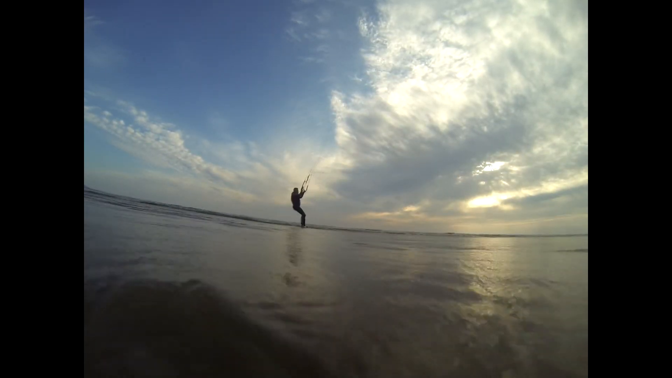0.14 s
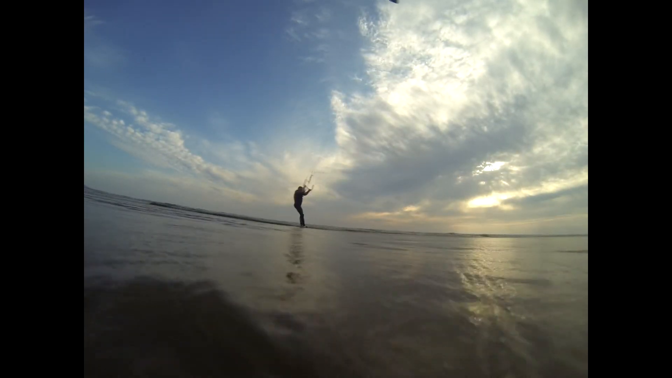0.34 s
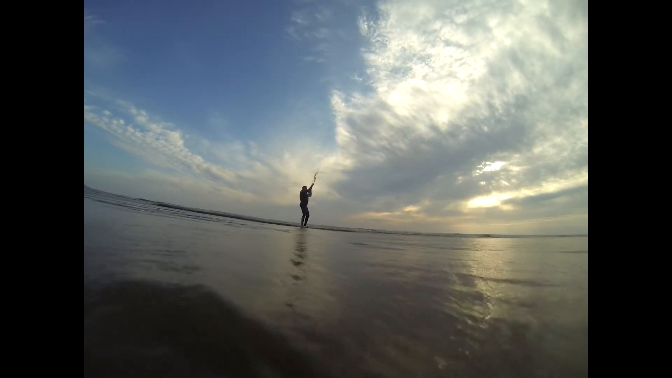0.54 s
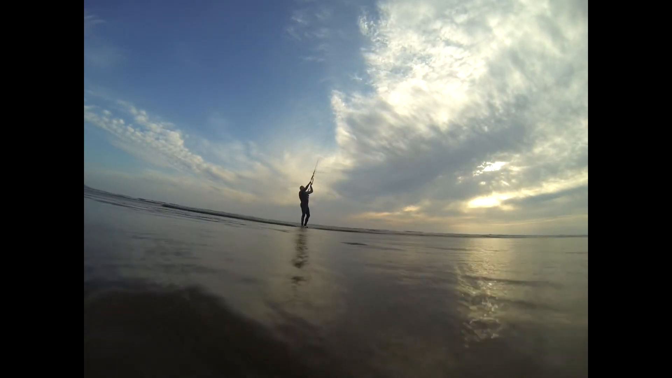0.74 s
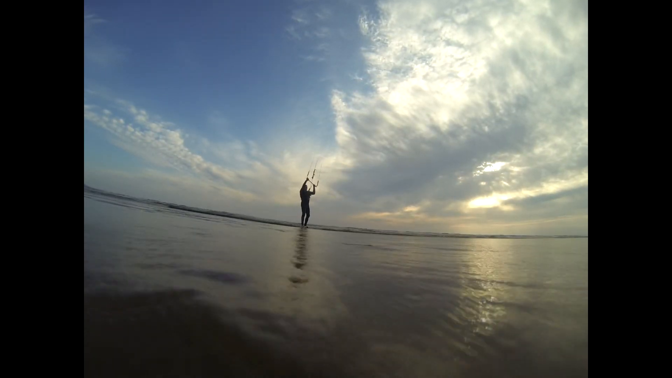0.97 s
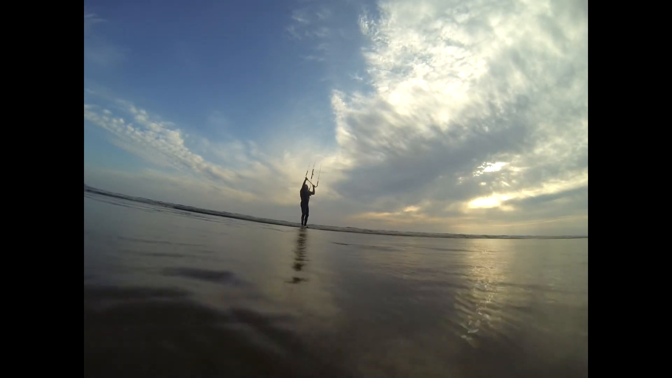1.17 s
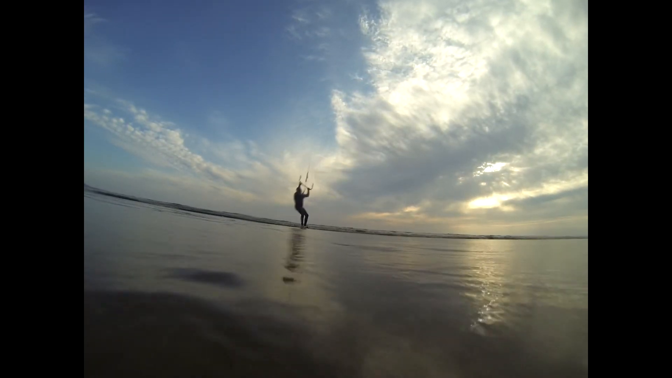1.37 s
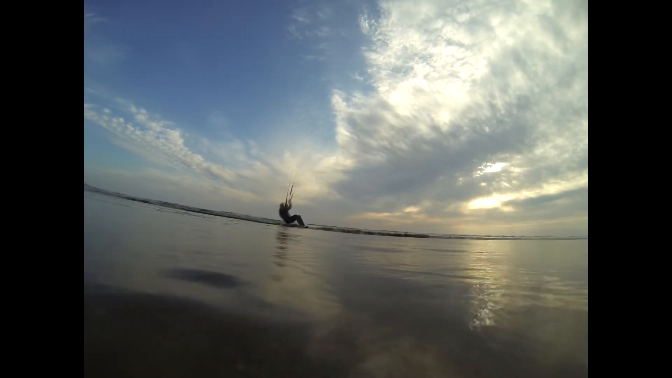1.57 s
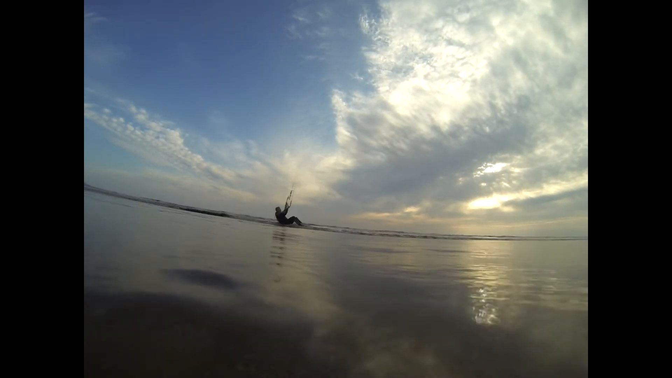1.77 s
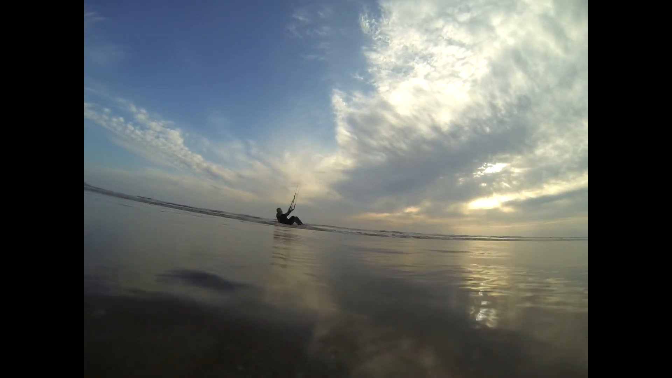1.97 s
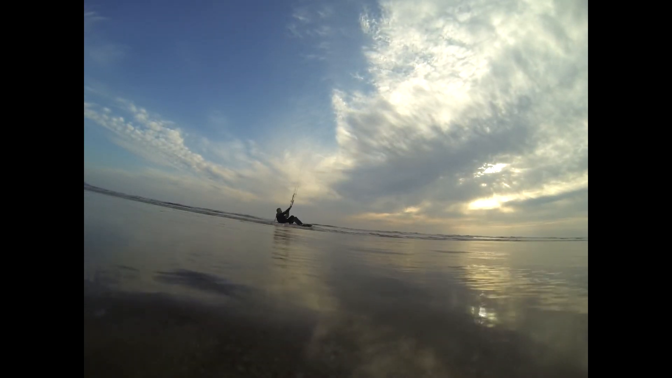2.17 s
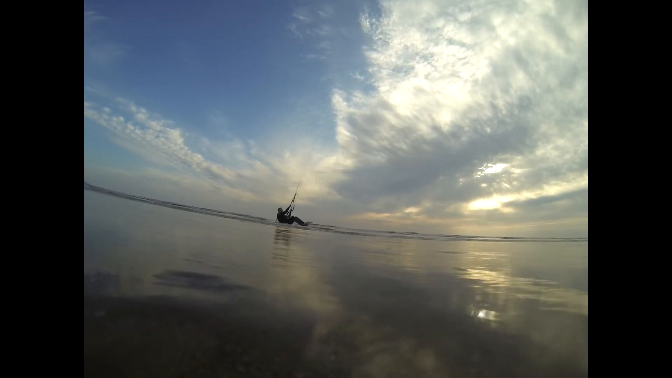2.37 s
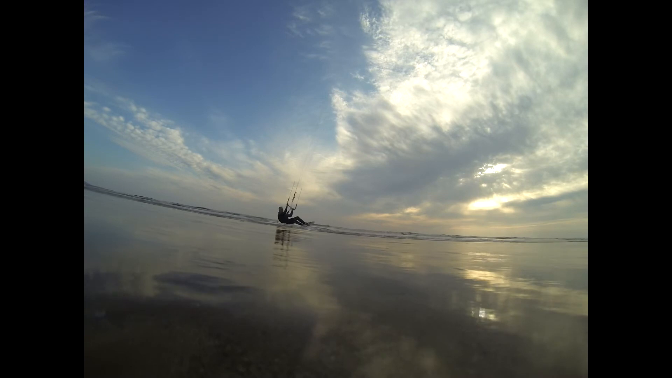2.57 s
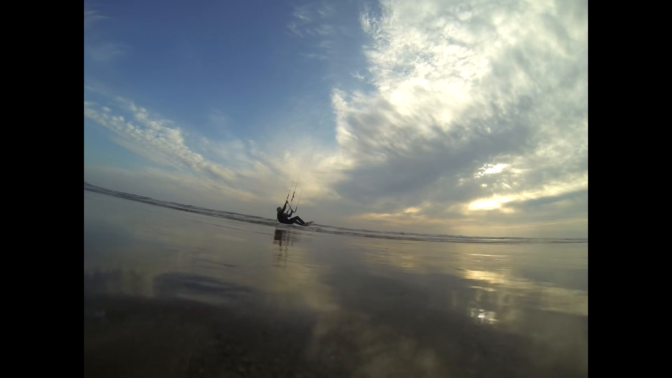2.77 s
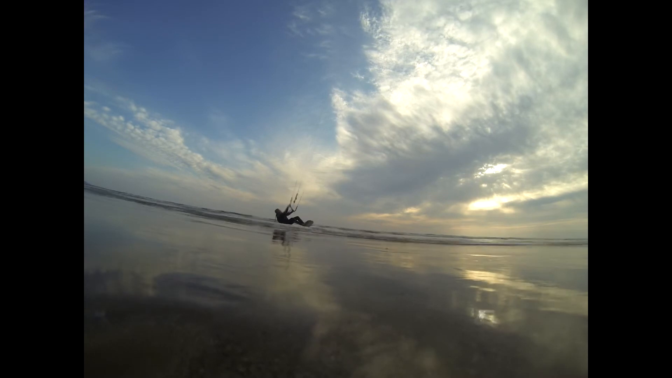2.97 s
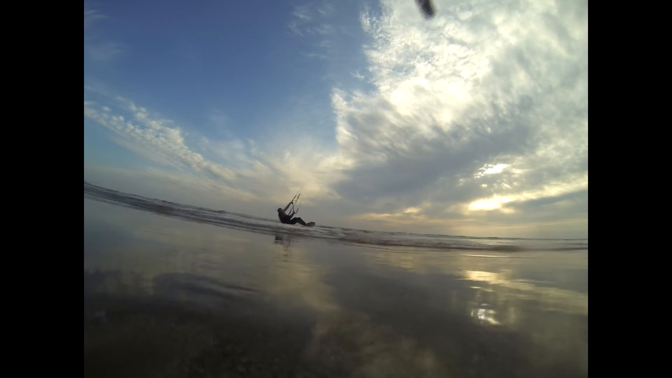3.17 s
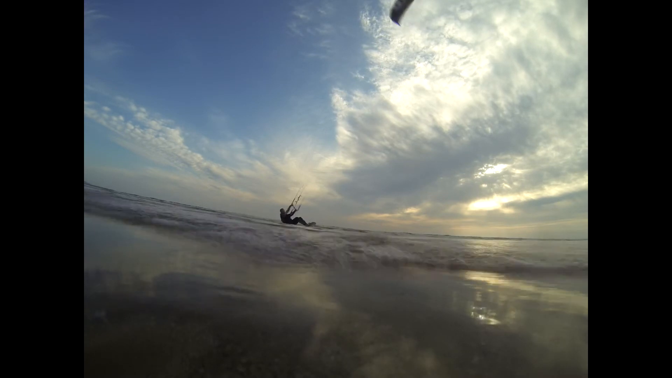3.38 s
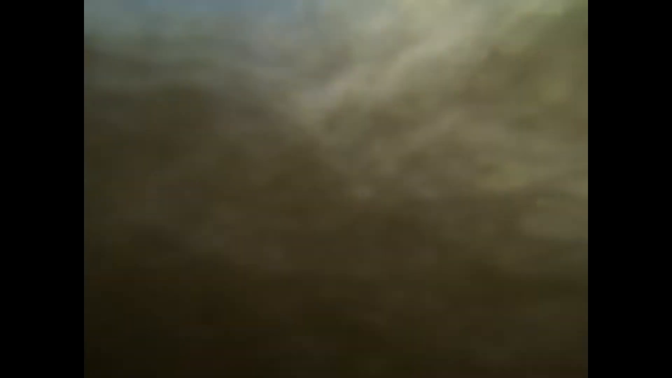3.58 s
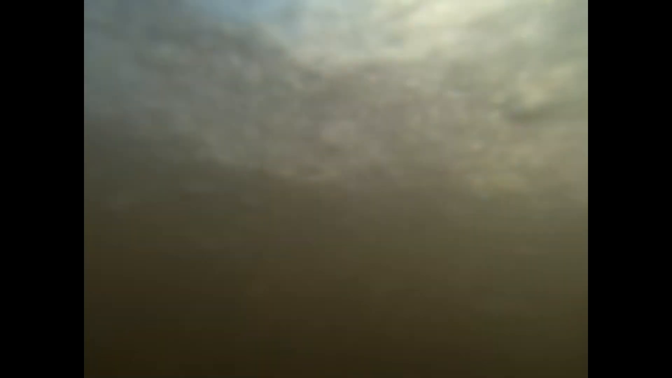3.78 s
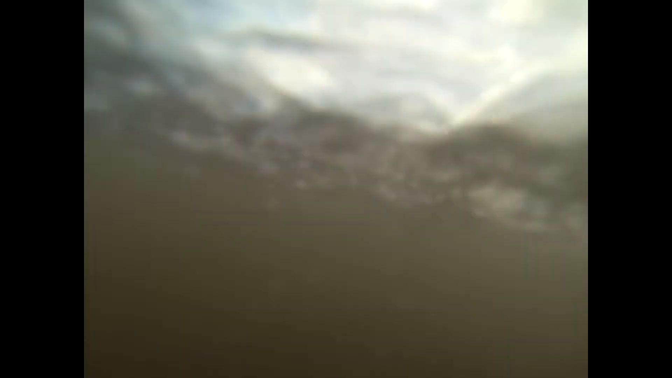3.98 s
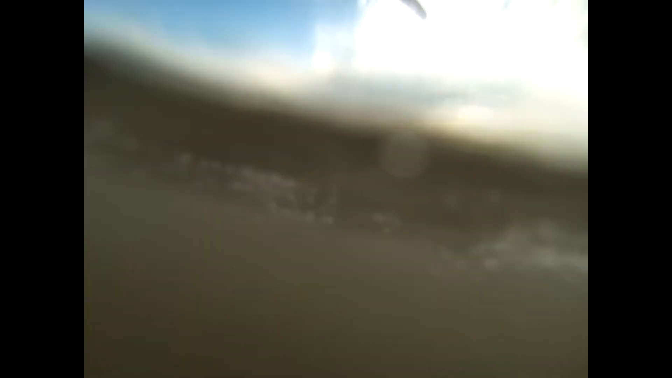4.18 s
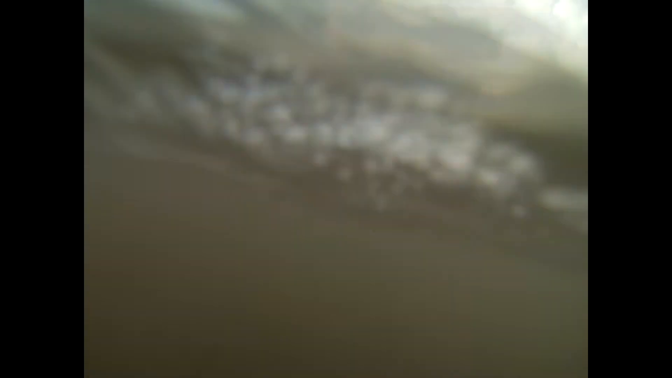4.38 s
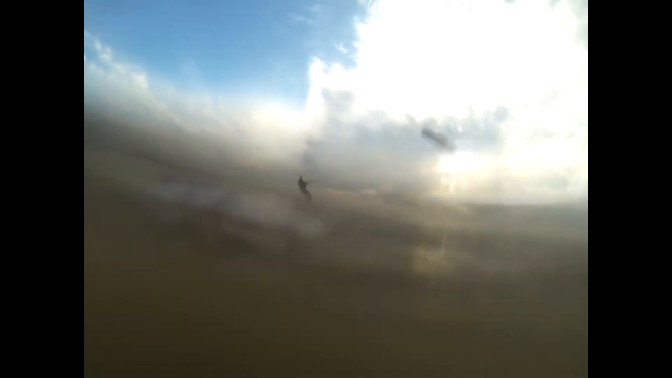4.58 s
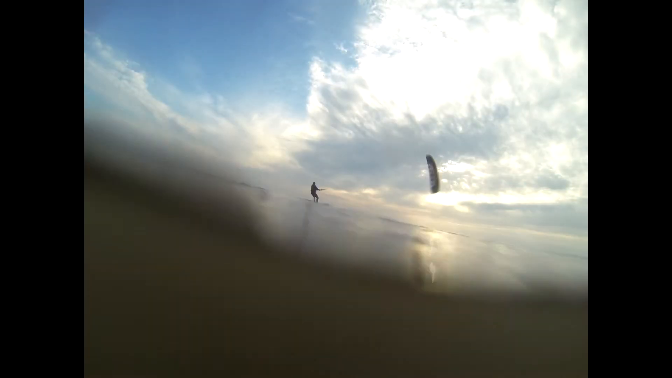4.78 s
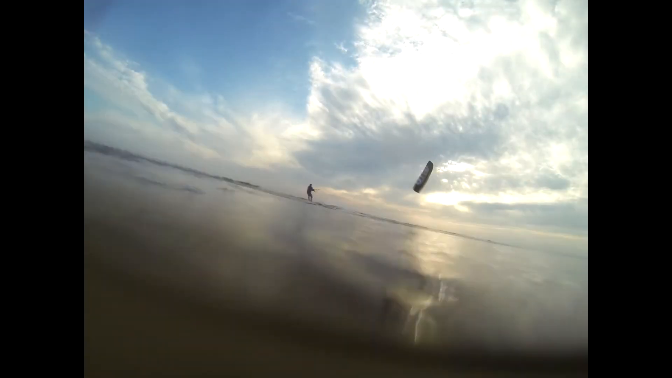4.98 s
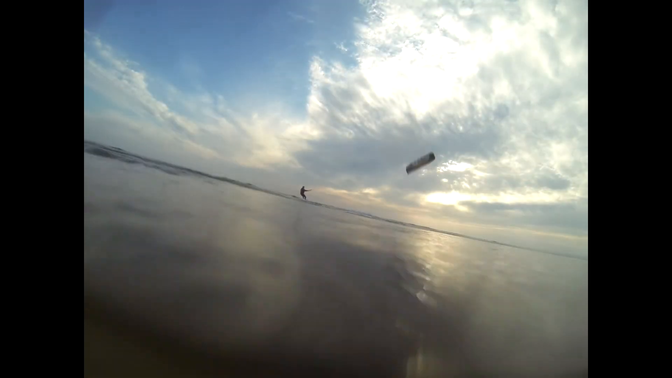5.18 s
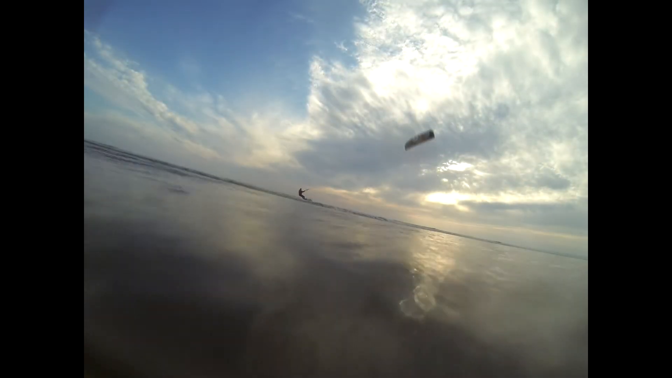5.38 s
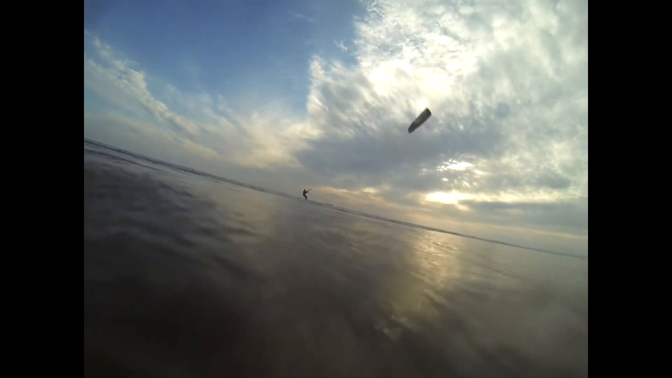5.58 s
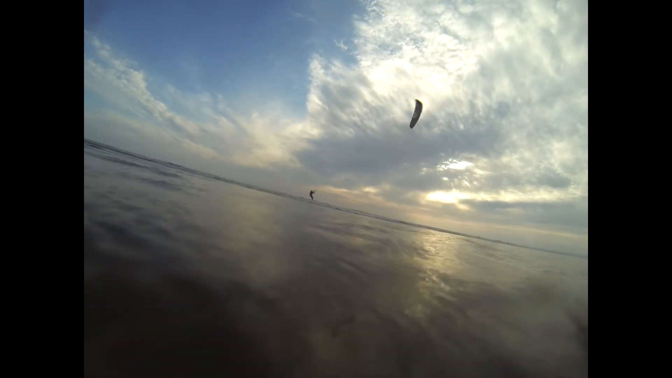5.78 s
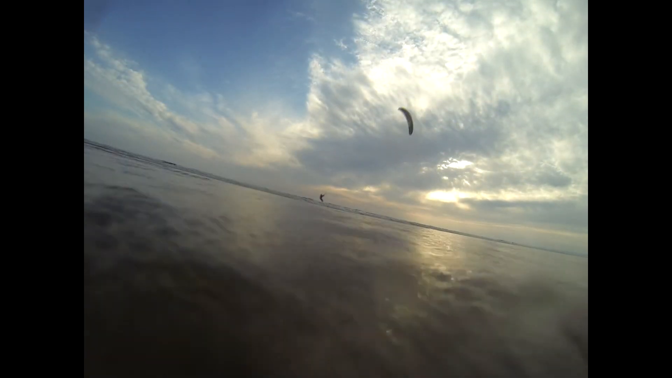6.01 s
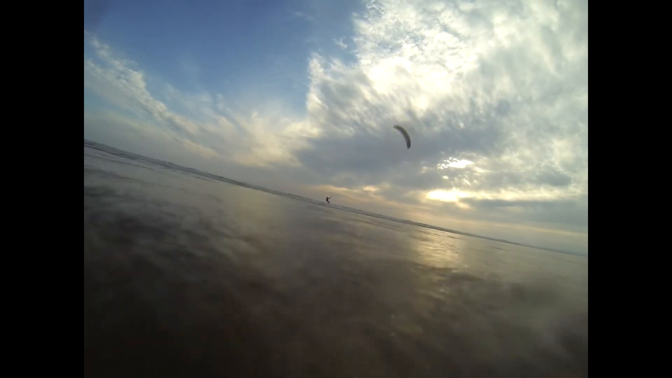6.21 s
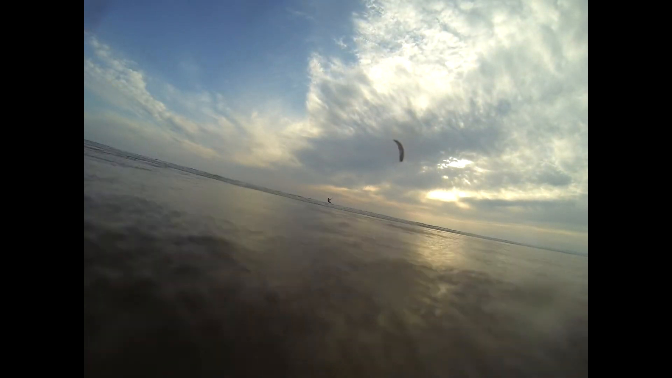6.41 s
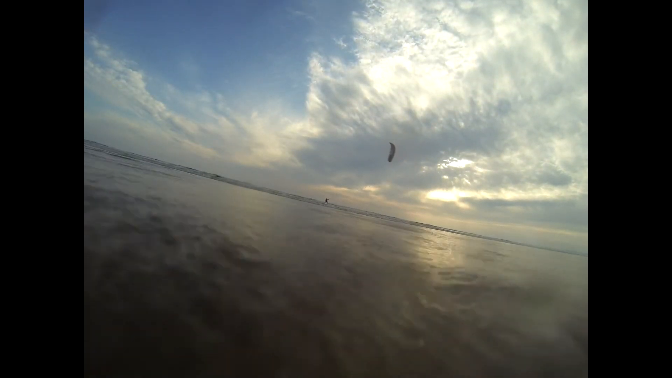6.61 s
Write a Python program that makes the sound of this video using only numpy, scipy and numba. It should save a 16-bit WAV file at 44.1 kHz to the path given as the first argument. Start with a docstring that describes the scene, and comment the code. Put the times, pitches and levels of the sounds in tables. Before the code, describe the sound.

A shallow wave slaps over the microphone, gurgles and drains away, against faint distant surf and low wind rumble.

```python
"""A shallow wave slaps over a small camera in a sealed plastic housing, covers it, gurgles and drains away.
The camera lies on wet sand. Drops and bubbles tick on its shell, each ringing at its own pitch.
Behind them, distant surf reaches the one microphone through the housing's resonances (the pitches it
rings at), wind rumbles and the electronics whine. The gain control turns the loud splash down."""
import sys
import numpy as np
from scipy import signal
from scipy.io import wavfile
from scipy.ndimage import uniform_filter1d
from numba import njit

SR = 44100
rng = np.random.default_rng(int(sys.argv[2]) if len(sys.argv) > 2 else 0)


def unload_audio(sound):
    """Save the sound as a 16-bit wav file, at the path given as the first command line argument."""
    columns = np.transpose(np.atleast_2d(sound))
    # keep every value between -1 and 1, then stretch to whole-number steps
    steps = np.round(np.clip(columns, -1, 1) * 32767)
    wavfile.write(sys.argv[1], SR, steps.astype(np.int16))


N = 293265

# steady tones of the electronics: (pitch [Hz], level [dB])
WHINE_TONES = [(7101, -86.5), (9469, -106), (11838, -89.5), (14207, -100)]
# resonances that let outside sound through the housing: (pitch [Hz], width [Hz], level [dB])
HOUSING_RESONANCES = [(688, 1220, -12.5), (1509, 473, 2.5), (3056, 1970, -18.5), (5300, 320, -33),
                      (8600, 2800, -71)]
# the background over time: (time [s], surf level [dB], backwash level [dB], hiss level [dB])
SHORE_LEVELS = [(0, -62.5, -66, -76.5), (.9, -63.5, -75, -76.5), (1.35, -61.5, -76, -72.5),
                (2, -62.5, -76, -75), (3.3, -63, -77, -84.5), (4.2, -61, -59.5, -82),
                (4.43, -60.5, -57.5, -80), (4.47, -58, -58, -92), (4.53, -63.5, -56, -80),
                (4.87, -65, -63.5, -74.5), (5.25, -66, -61, -74.5), (5.6, -59, -54, -81),
                (5.68, -64, -58, -73), (5.71, -58.5, -55.5, -83), (6.1, -60.5, -54, -74.5),
                (6.35, -63, -55.5, -73), (6.65, -65.5, -59, -70.5)]
# tones of the knocked shell: (pitch [Hz], level [dB], time to fade by 60 dB [s])
SHELL_TONES = [(675, -8.5, 0.0098), (980, -14, 0.0066), (1704, 0, 0.019), (3010, -4.5, 0.014),
               (5050, -15.5, 0.0085), (6600, -19.5, 0.0058), (7200, -19, 0.0075), (10800, -24.5, .003)]
# drops hitting the shell: (time [s], level [dB], pitch [Hz], share in the delayed copy [0-1])
DROP_HITS = [(.2208, -32.5, 2770, 0.72), (.2494, -45, 2920, 0.3), (.2564, -47, 2680, .7),
             (.7531, -44, 2640, .75), (.8118, -18.5, 1980, 0.23), (.9597, -52.5, 2040, 0),
             (1.5507, -33.5, 1490, 0.88), (1.551, -36.5, 3010, .85), (3.4966, -30.5, 1340, 0),
             (3.5099, -15.5, 1520, 0.1), (3.538, -20.5, 1590, .45), (3.557, -53, 7860, 0.1),
             (3.6455, -14, 1415, 0.33), (3.649, -31, 3950, 0.2), (3.6848, -39, 5180, 0.9),
             (3.6853, -24, 1460, 0.3), (3.7305, -16.5, 1500, 0.33), (3.7831, -39, 5600, 0.03),
             (3.8672, -25, 1380, 0), (3.8689, -26, 3550, 0.4), (3.8885, -41, 8550, 0.15),
             (3.9316, -29, 8230, 0.76), (3.9824, -50, 2220, 0.1), (4.0861, -33, 1575, .55),
             (4.1093, -37.5, 1910, 0.1), (4.1156, -51.5, 7190, 0), (4.149, -31, 1330, 0.37),
             (4.1623, -58, 9500, 0.5), (4.248, -62, 6000, 0), (4.345, -61, 8340, 0.1),
             (4.414, -63, 9400, 0), (4.459, -45, 1490, 0.24), (5.98, -59, 4770, 0),
             (6.5401, -40, 2850, 0.09), (6.6269, -50, 1830, 0.08), (6.6358, -55, 1680, 0)]
# bubbles against the shell: (time [s], level [dB], pitch [Hz], share in the delayed copy [0-1])
BUBBLE_HITS = [(3.5033, -25.5, 3900, 0.4), (3.5042, -21, 1250, 0.11), (3.5406, -37, 3190, 0),
               (3.6003, -19.5, 1570, 0.68), (3.572, -36, 930, 0.24), (3.599, -32, 592, 0.5),
               (3.6353, -30, 3230, 0.4), (3.6617, -36, 3470, 0.2), (3.689, -26, 1056, 0.34),
               (3.7131, -31, 4240, 0.19), (3.7321, -25.5, 884, 0), (3.7367, -35.5, 3200, 0.5),
               (3.7898, -36, 3240, 0.06), (3.8154, -50, 4760, 0), (4.0943, -43.5, 5300, 0.92),
               (4.149, -50, 3470, 0), (4.1635, -35, 1620, 0.5), (4.295, -58, 3250, 0.2)]
# the wave's path over the shell: (time [s], water level [dB], share of the shell covered [0-1])
WAVE_COURSE = [(3.48, -66, 0.45), (3.505, -31.5, 0.02), (3.55, -43, 0.02), (3.583, -42.5, 0.14),
               (3.601, -48.5, 0.87), (3.701, -35.5, 0.66), (3.77, -44, 0.55), (3.8, -42.5, 0.68),
               (3.865, -33, 0.49), (3.95, -40.5, 0.65), (4.05, -48.5, 0.63), (4.09, -57.5, 0.73),
               (4.3, -76.5, 0.75)]

AMP_HISS_DB, STEREO_HISS_DB, WIND_DB = -87.5, -111, -59.5
WET_FROM_S, WET_HZ, WET_WIDTH_HZ, WET_DB = 3.75, 1045, 145, -5  # extra resonance of the wet shell
COPY_DELAY_S = 0.016  # each tick is heard doubled by a copy 16 ms later
COVERED_KNOCK_DB = -7  # a fully covered shell knocks this much more softly
# added to the wave's water level: (when bare [dB], when covered [dB])
SHOVE_DB, GURGLE_DB, SPRAY_DB = (-2.5, 3), (-43.5, 9.5), (-22, -79)
MUFFLE_HZ = 2440  # covering water dulls the churning above this
TILT_DB, TILT_HZ = -28, 2780  # the left channel has a little less bass and middle than the right
LOUD_FROM_DB, GAIN_RATIO, ATTACK_S, RELEASE_S = -40, 1.25, 0.0023, 0.03  # gain control
TREBLE_CUT_HZ = 15300


def undb(db):
    """Turn decibels into a number to multiply by."""
    return 10 ** (np.asarray(db) / 20)


def unit(x):
    """Scale a signal so its average strength (rms) is 1."""
    return x / np.sqrt(np.mean(x ** 2))


def curves(table):
    """Join each column's values with straight lines over time."""
    times, *columns = np.transpose(table)
    return [np.interp(np.arange(N) / SR, times, column) for column in columns]


def band(x, hz, width):
    """A resonance: keep the sound near one pitch."""
    return signal.lfilter(*signal.iirpeak(hz, hz / width, fs=SR), x)


def steep(x, hz, width):
    """A resonance applied twice, so less gets through on either side."""
    return band(band(x, hz, width), hz, 0.77 * width)


def wander(rate):
    """A smooth random curve of size about 1 that heads for a new value `rate` times a second."""
    hold = int(SR / rate)
    steps = np.repeat(rng.standard_normal(N // hold + 1), hold)
    return unit(uniform_filter1d(uniform_filter1d(steps, hold), hold)[:N])


def patter(rate, spread_db, smooth):
    """About `rate` tiny impacts a second, uneven in size, over some smooth noise."""
    hits = rng.random(N) < rate / SR
    sizes = undb(spread_db * np.minimum(rng.exponential(size=N), 4)) * rng.standard_normal(N)
    return unit(unit(hits * sizes) + smooth * rng.standard_normal(N))


def rumble(hz, width, tail_db):
    """Swirling air or water pushes on the shell: deep noise with a faint tail of higher pitches."""
    push = rng.standard_normal(N)
    tail = signal.lfilter([1], [1, -np.exp(-2 * np.pi * 120 / SR)], rng.standard_normal(N))
    return unit(unit(steep(push, hz, width)) + undb(tail_db) * unit(tail))


def housing(x):
    """Outside sound passes through the shell's resonances; neighbouring ones swing opposite ways."""
    wet = np.clip((np.arange(N) / SR - WET_FROM_S) / 0.083, 0, 1)
    passed = sum((-1) ** k * undb(db) * steep(x, hz, width)
                 for k, (hz, width, db) in enumerate(HOUSING_RESONANCES))
    return passed + wet * undb(WET_DB) * steep(x, WET_HZ, WET_WIDTH_HZ)


def electronics():
    """The electronics whine thinly and steadily over the amplifier's hiss."""
    t = np.arange(N) / SR
    whine = sum(undb(db) * np.sqrt(2) * np.sin(2 * np.pi * (hz * t + rng.random()))
                for hz, db in WHINE_TONES)
    return whine + undb(AMP_HISS_DB) * unit(band(rng.standard_normal(N), hz=5500, width=13000))


def wind():
    """Gusts push on the shell and make it rumble."""
    return rumble(hz=43, width=44.6, tail_db=-11.5) * undb(WIND_DB + 1.46 * wander(5.41))


def surf(level_db):
    """Distant surf: a fine patter heard through the housing."""
    wash = unit(housing(patter(rate=1500, spread_db=-1.4, smooth=1.7)))
    return wash * undb(level_db + 0.73 * wander(9))


def backwash(fizz, level_db):
    """Draining water drags and sizzles at the shell."""
    drag = rumble(hz=72.4, width=66.4, tail_db=-16)
    sizzle = undb(-33.5) * unit(steep(fizz, 4290, 300))
    return (drag + sizzle) * undb(level_db + 2.0 * wander(6))


def shore():
    """Surf, backwash and a broad hiss, each swelling on its own."""
    surf_db, backwash_db, hiss_db = curves(SHORE_LEVELS)
    fizz = patter(rate=1500, spread_db=4.5, smooth=1.5)
    hiss = unit(undb(3.5) * steep(fizz, 856, 680) + steep(fizz, 3170, 1600)
                + undb(-14) * steep(fizz, 4250, 400) + undb(-11) * steep(fizz, 5300, 760))
    return surf(surf_db) + backwash(fizz, backwash_db) + hiss * undb(hiss_db)


def ring(hz, fade_s):
    """A struck tone builds over about one cycle, then fades by 60 dB in `fade_s`."""
    t = np.arange(SR // 12) / SR
    shape = (1 - np.exp(-t * hz * 1.16)) ** 2 * np.exp(-np.log(1000) * t / fade_s)
    return shape / shape.max() * np.sin(2 * np.pi * hz * t)


def ticks(hits, ring_cycles, knock_db):
    """Each drop or bubble rings at its own pitch and knocks the shell, more softly under water."""
    sound = np.zeros(N + SR)
    knock = undb(knock_db) * sum(undb(db) * ring(hz, fade_s) for hz, db, fade_s in SHELL_TONES)
    wave_times, _, cover = np.transpose(WAVE_COURSE)
    for time, db, hz, copy_share in hits:
        softening = undb(COVERED_KNOCK_DB * np.interp(time, wave_times, cover, right=0))
        tick = undb(db) * (ring(hz, ring_cycles / hz) + softening * knock)
        for delay, share in ((0, 1 - copy_share), (COPY_DELAY_S, copy_share)):
            start = int((time + delay - 0.64 / hz) * SR)  # a little early, as the ring needs time to build
            sound[start:start + len(tick)] += share * tick
    return sound[:N]


def droplets(spray_db, count):
    """Small, high-pitched droplets are scattered through the spray."""
    when, pitch, size, copy_share = rng.random((count, 4)).T
    times = WAVE_COURSE[0][0] + when * (WAVE_COURSE[-1][0] - WAVE_COURSE[0][0])
    levels_db = spray_db[(times * SR).astype(int)] + 9 + 15 * size
    return ticks(zip(times, levels_db, 4500 * 2.6 ** pitch, copy_share), ring_cycles=22, knock_db=-40)


def churning(water_db, cover):
    """Churning water batters the shell and sounds duller the more of it is covered."""
    impacts = patter(rate=900, spread_db=1.0, smooth=1.0)
    water = unit(housing(impacts) + undb(-11.5) * steep(impacts, 2400, 1840))
    water *= undb(water_db + 2.15 * wander(40))
    muffled = signal.lfilter(*signal.butter(2, MUFFLE_HZ, fs=SR), water)
    return water + cover * (muffled - water)


def wave():
    """The wave washes over the shell: more cover means more shove and gurgle, and less spray."""
    water_db, cover = curves(WAVE_COURSE)
    shove_db, gurgle_db, spray_db = (water_db + bare + (covered - bare) * cover
                                     for bare, covered in (SHOVE_DB, GURGLE_DB, SPRAY_DB))
    t = np.arange(N) / SR
    passing = (t > WAVE_COURSE[0][0]) & (t < WAVE_COURSE[-1][0])
    water = churning(water_db, cover)
    shove = rumble(hz=52, width=100, tail_db=-26) * undb(uniform_filter1d(shove_db, size=SR // 30))
    gurgle = unit(steep(patter(rate=300, spread_db=7.5, smooth=0.99), 825, 900)) * undb(gurgle_db)
    spray = unit(steep(patter(rate=570, spread_db=1.0, smooth=0.59), 8700, 6100))
    spray *= undb(spray_db + 3.6 * wander(41))
    return passing * (water + shove + gurgle + spray + droplets(spray_db, count=140))


def scene():
    """One microphone feeds all the sounds to both channels, slightly out of balance."""
    drops = ticks(DROP_HITS, ring_cycles=12.7, knock_db=-10)
    bubbles = ticks(BUBBLE_HITS, ring_cycles=50, knock_db=-26)
    mono = wind() + shore() + drops + bubbles + wave() + electronics()
    lows = signal.lfilter(*signal.butter(1, TILT_HZ, fs=SR), mono)
    side = undb(STEREO_HISS_DB) * rng.standard_normal(N) - undb(TILT_DB) * lows
    return np.array([mono + side, mono - side])


@njit
def follow(x, attack, release):
    """Track how loud a signal is, rising at the `attack` speed and falling at the `release` speed."""
    loudness, level = np.empty(len(x)), 0.
    for i in range(len(x)):
        level += (abs(x[i]) - level) * (attack if abs(x[i]) > level else release)
        loudness[i] = level
    return loudness


def record(dry):
    """The gain control turns loud moments down, then the highest treble is cut off."""
    loudness = follow(dry.mean(axis=0), 1 / (ATTACK_S * SR), 1 / (RELEASE_S * SR))
    gain = np.minimum(1, (undb(LOUD_FROM_DB) / (loudness + 1e-9)) ** (1 - 1 / GAIN_RATIO))
    treble_cut = signal.ellip(10, .2, 80, TREBLE_CUT_HZ, fs=SR, output="sos")
    return signal.sosfilt(treble_cut, dry * gain)


dry = scene()
out = record(dry)
unload_audio(out)
```